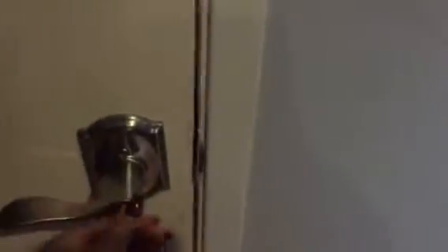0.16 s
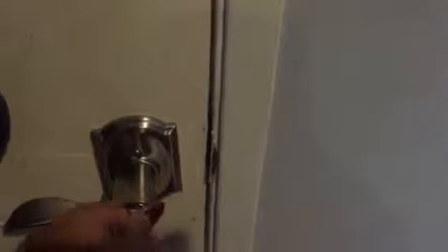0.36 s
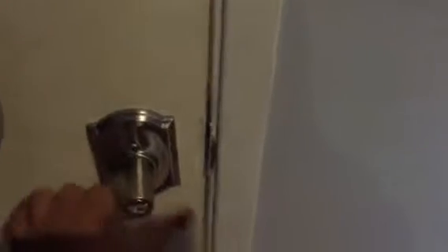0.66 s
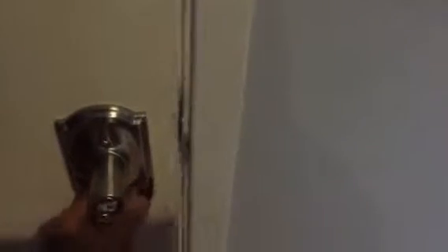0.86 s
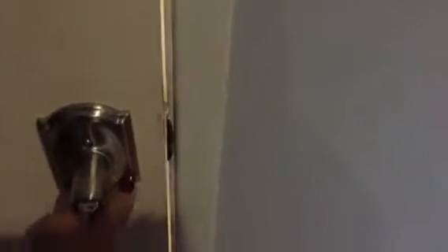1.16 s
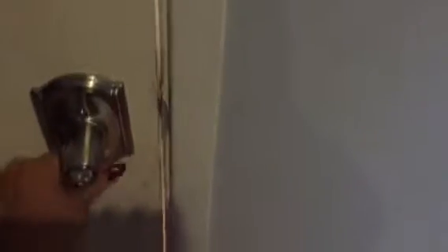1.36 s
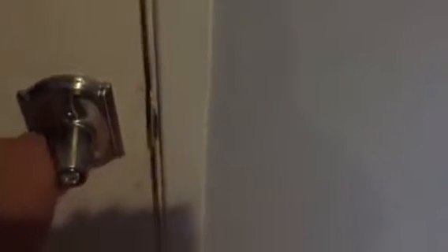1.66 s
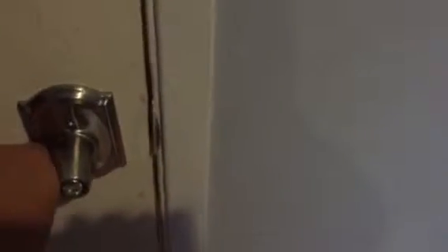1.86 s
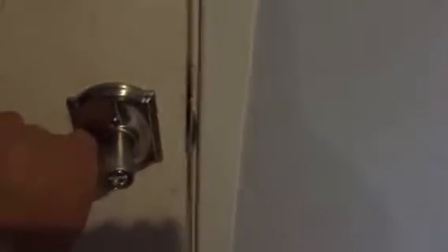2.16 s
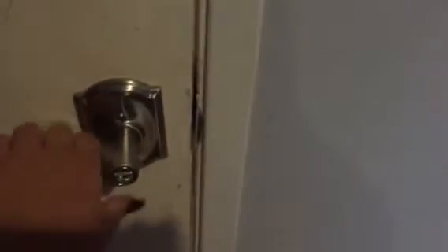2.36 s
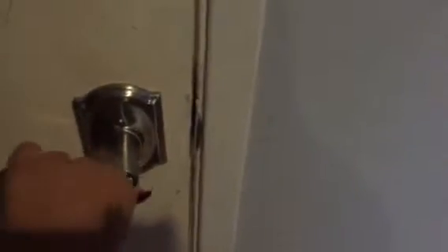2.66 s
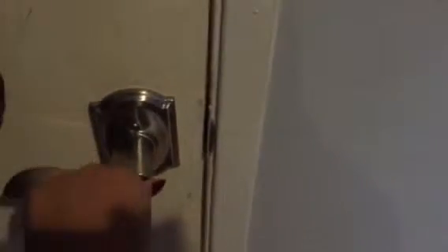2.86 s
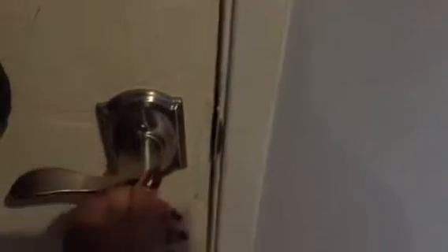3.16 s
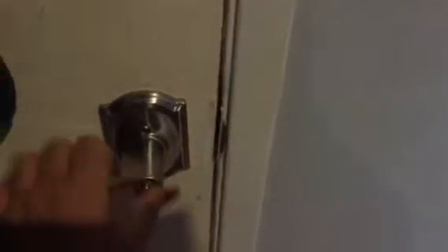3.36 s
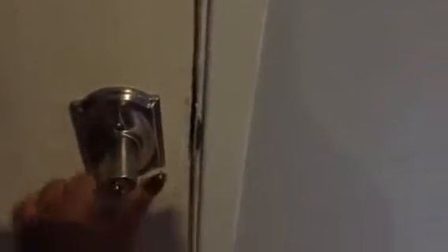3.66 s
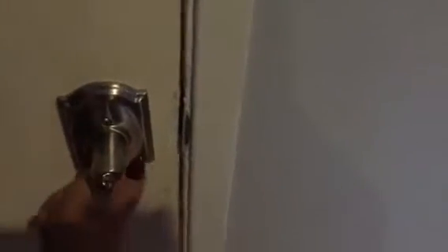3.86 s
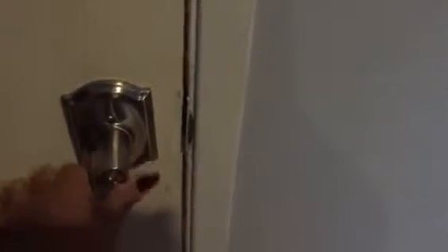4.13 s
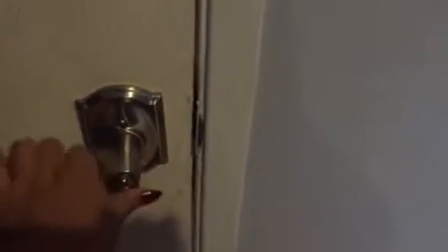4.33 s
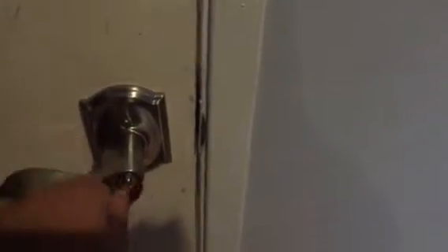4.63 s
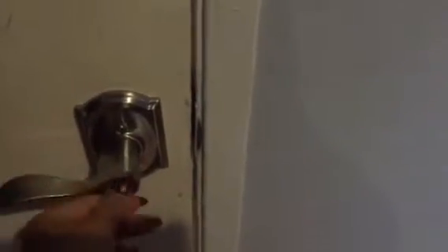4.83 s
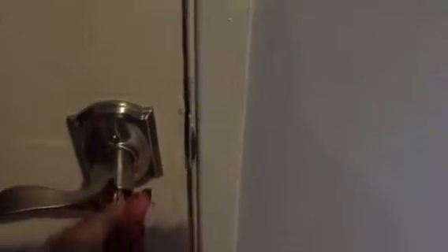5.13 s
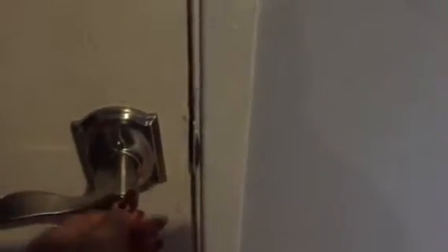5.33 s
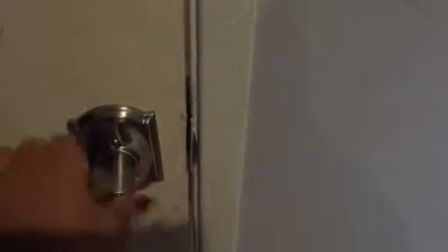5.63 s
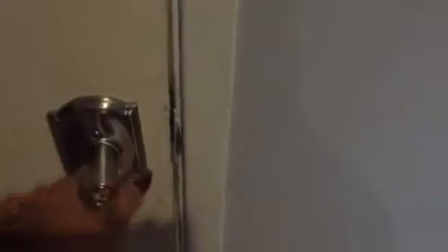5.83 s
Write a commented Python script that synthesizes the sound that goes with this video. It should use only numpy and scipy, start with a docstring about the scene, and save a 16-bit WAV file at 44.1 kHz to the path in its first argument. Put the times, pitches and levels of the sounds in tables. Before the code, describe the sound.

Irregular metallic clicks and clacks of a door handle being jiggled, with low thuds of the door against its frame, close up indoors.

```python
"""A faint hush and a small hollow pop come first, then metal clicks as a hand works a door lever.
Each click is a noise crack with a rattle; thuds and thin tinks are sums of fading tones.
The grip is noise ringing the door and grating the spindle; soft hiss swells and fades.
A short wash of filtered noise answers all the blows in a small hard room, heard through a phone."""
import sys
import numpy as np
from scipy import signal
from scipy.fft import rfft, irfft
from scipy.io import wavfile
from scipy.ndimage import uniform_filter1d

SR = 44100
rng = np.random.default_rng(int(sys.argv[2]) if len(sys.argv) > 2 else 0)


def pcm_store(signal):
    """Save signal as 16-bit PCM."""
    levels = np.round(np.clip(np.atleast_2d(signal), -1, 1) * 32767)
    wavfile.write(sys.argv[1], SR, levels.astype(np.int16).T)


N = 264189  # length in samples

# metal clicks of latch and spindle, before the room:
# start_s, peak_level_db, treble_db and low_mids_db (both over the mids), rattle_db (strength beside the crack)
METAL_CLICKS = [(0.0971, -30.5, -14, 2, -14.5), (0.1453, -41, -16.5, -13, -11), (0.153, -47, -17, 0, -20),
                (0.2345, -25, -1, 2, -8.5), (0.2423, -18.5, -6, -1, -15), (0.3164, -9.5, 3.5, 6.5, -17.5),
                (0.319, -23, -2, -3, -22), (.5591, -28.5, 6, -15, -26), (0.5696, -32.5, -46, -10.5, -28),
                (.5808, -36, -9, 1.5, -11), (0.64, -37, -18, -18, -22), (.648, -28, -21, -42, -36),
                (.6546, -32, -9, -7, -11.5), (0.6625, -29.5, -17, 14, -24), (0.784, -54, -16, -12, -5),
                (0.799, -39, -11, -11, -12.5), (0.814, -36.5, -18, -1, -30), (.822, -44.5, -20, -12, -8),
                (.8444, -45, -8, 4, -21), (0.883, -32, -13, -15, -33), (0.9379, -31.5, -7.5, -6, -14.5),
                (0.9469, -34, -8, -24, -18), (0.9756, -41, -9, -10, -13), (1.0929, -48.5, -30, 6.5, -14.5),
                (1.117, -54.5, -2, 9, -9), (1.324, -35.5, -16, -5.5, -18.5),
                (1.3776, -23.5, -5.5, -6.5, -13.5), (1.382, -24, -12, -19, -27),
                (1.3904, -33, -22, -13, -14), (1.4617, -16, -8.5, -1.5, -22),
                (1.4788, -32, -12.5, -4.5, -16.5), (1.5102, -32, -13, -24, -1), (1.5151, -29, -7, -7, 0),
                (1.5254, -23, 1, -16, -6), (1.5335, -15, -7.5, -17, -15), (1.5708, -14.5, 7, -25, -2.5),
                (1.5808, -7, -11, -15, -21), (1.5858, -26.5, -16, 6, -26.5), (1.614, -37.5, -15, -18, 0.5),
                (1.6957, -27.5, 1, 22, -30), (1.7408, -42, -34, 10, -2), (1.874, -37, 13, -2, -23),
                (1.8856, -42.5, 5, -11, -12.5), (1.9363, -49, -8.5, 1, -18), (1.9935, -45.5, 15, -20, -37),
                (2.033, -41.5, -11, 0, -13.5), (2.0657, -41, -15, 0, -15), (2.0768, -40.5, -20, -1, -15),
                (2.081, -38, 8, 23, -15), (2.0885, -44, 4, -21, -28), (2.098, -26.5, -5.5, -21, -35),
                (2.1021, -30.5, -39, -4, -42), (2.138, -40, -17, -13, -2),
                (2.1537, -20.5, -15.5, -7, -22.5), (2.1757, -40, -17, 2, -7), (2.3456, -50, -23, -6, -11),
                (2.367, -35.5, -8.5, 2.5, -9), (2.3814, -33, -16, -5, -14.5), (2.3874, -36.5, -13, -7, -27),
                (2.4953, -32.5, -8, 3.5, -16.5), (2.5083, -30.5, -13, -28, -15),
                (2.5434, -33.5, -0.5, 6, -15), (2.555, -31.5, 14, -18, -17), (2.8103, -43, 11, 10, 2.5),
                (2.8273, -37.5, -13, 8, -13), (2.8376, -24.5, -13.5, 2.5, -21), (2.8624, -45, -12, 6, -13),
                (2.9034, -35.5, -24, -5, -18.5), (2.9174, -52.5, -1, 5, -27.5), (2.9229, -30.5, 9, -5, -35),
                (2.931, -26, -23, 22, -27), (3.0662, -38.5, -13, -17, -19),
                (3.1513, -30, -15.5, -14.5, -13), (3.1738, -37, -10, -3, -3.5), (3.1966, -18, -1, 5.5, -16),
                (3.4011, -30.5, -1, -21, -22.5), (3.4039, -29, -12, -14.5, -17),
                (3.4152, -31, -35.5, -10, -15.5), (3.454, -45, -29, -7, -20),
                (3.462, -31.5, -10, -5.5, -11.5), (3.48, -27.5, -20.5, -21.5, -18),
                (3.518, -32, -2.5, -29, -22), (3.531, -40, -7, -19, -19.5),
                (3.5726, -38, -31.5, -13, -16.5), (3.6476, -6, -9, -16, -12.5),
                (3.6528, -10, -27, -9, -13.5), (3.7004, -29.5, -24.5, -19.5, -17),
                (3.769, -30, -11.5, -9, -15), (3.7864, -31, -18.5, 10, -15.5), (3.8019, -25, -0.5, 8, -21),
                (4.217, -40, -24, -9, -12.5), (4.252, -49, -6, -18, -3), (4.338, -24, -10, -3, -12.5),
                (4.356, -36.5, -15, -2, -15), (4.3913, -30.5, 0, -20, -25), (4.4039, -17.5, -16, 13, -33.5),
                (4.4138, -39, -23, 10, -17), (4.4304, -20, -1, 4, -22), (4.4914, -41, -29, -2, -16),
                (4.518, -33, -10.5, -1, -20), (5.0788, -43, -12, 13, -10), (5.135, -30.5, -38, 19, -16),
                (5.1545, -30, 4, 14, -32), (5.218, -38.5, 5.5, -33, -29), (5.338, -56, -16, -12, -21),
                (5.3967, -41, -13, 8.5, -12), (5.4054, -26, -11.5, 8.5, -10.5),
                (5.4112, -33.5, -5, -26, -8.5), (5.4158, -32.5, -12, -3, -3), (5.441, -33, -13, 9, -8),
                (5.4773, -46, -8, -10, -24), (5.496, -14, 3.5, -2, -11), (5.4975, -15.5, -6, -2.5, -16),
                (5.528, -33.5, -38, -6, -7.5), (5.6954, -29, -1, -20, -39), (5.7042, -28, -14.5, -7, -23.5),
                (5.7801, -37, -18, -20, -14), (5.79, -34.5, -8, 8, -13), (5.7966, -33, -20, -4.5, -9),
                (5.8906, -44.5, -22, 1, -1), (5.9061, -32.5, -11.5, 0, -18), (5.9543, -43, -16, -14, -14),
                (5.9698, -33.5, -5, -7, -20), (5.9834, -36, -19, -9, -22)]
# knocks of the door leaf against its frame:
# start_s, panel_peak_db, deep_db and woody_db (peaks over the panel's)
FRAME_THUDS = [(0.105, -43.5, 3.5, -0.5), (0.185, -33, 4.5, 1), (0.252, -35, -8, -17),
               (.325, -26, -25, -27), (0.588, -32, -28, -3), (0.658, -26.5, -30, -10.5),
               (0.844, -32.5, -25, -8), (.887, -25.5, 2.5, -15), (0.938, -28, -2, -34),
               (1.094, -37, -26, -9.5), (1.329, -46.5, -6.5, 7.5), (1.468, -40.5, -3.5, -3.5),
               (1.535, -28, -22, 0.5), (1.593, -9.5, -0.5, -3.5), (1.638, -17, 9, -7.5),
               (1.679, -31.5, -7, 6), (1.741, -27.5, -15, 1.5), (1.787, -44, -12, -19),
               (1.872, -27.5, -27, -8.5), (1.947, -32, -22, -30), (2.045, -32.5, -25, 0),
               (2.162, -24.5, -8, -5), (2.369, -30.5, 2, 6), (2.501, -36.5, -18, 3), (2.551, -38.5, -5, -4),
               (2.827, -34.5, -26, -14), (2.902, -27.5, 10, 8), (2.96, -28.5, 5, -3),
               (3.188, -51.5, 12, 11), (3.278, -39, -16, -13), (3.411, -34.5, -16.5, -6),
               (3.477, -31.5, -10, -4.5), (3.565, -29, -14.5, -15.5), (3.654, -29.5, 0, -0.5),
               (3.787, -21.5, 5.5, 3), (4.209, -45, -18, 2.5), (4.366, -25, -27, -9.5),
               (4.41, -20.5, -35, -8), (4.515, -24.5, -20, -16.5), (5.02, -43.5, -21, -26),
               (5.088, -37, -11, -11), (5.134, -24, 6, 1), (5.416, -27, -10, -3.5),
               (5.501, -27, -22, -10.5), (5.796, -21, -36, -18), (5.899, -60, -10, 19),
               (5.97, -23, -25, -9)]
# light hard taps on the free lever:
# start_s, level_db (added to every tone), blunt_db_per_octave (added going down from the highest tone)
LEVER_TINKS = [(.0986, -57, 13.), (2.8110, -46, -4.), (2.8275, -60, 12.), (2.8386, -57, 13.),
               (2.857, -66, 13.)]
# ringing tones of the latch case, lever, door panel, whole leaf and wood:
# pitch_hz, level_db, t60_s (time to fall 60 dB)
LATCH_TONES = [(713, -6, 0.042), (1090, 5, 0.02), (1289.5, 9, 0.021), (1826, 8.5, 0.022), (2063, 3, 0.017),
               (2302, -8.5, 0.032), (2680, -2.5, 0.0033), (2995, -4.5, 0.032), (3200, -15.5, 0.01),
               (3640, -2.5, 0.062), (4477, -19.5, 0.012), (9700, -15.5, 0.019)]
LEVER_TONES = [(3800, -24, .05), (5830, -23, .15), (5905, -25, .12), (6900, -22, .08), (9200, -16, .05),
               (11700, -12, .025), (13600, 0, .045), (15600, -14, .04)]
PANEL_TONES = [(155.8, 0.28, 0.31), (193.96, 0.019, 0.24)]
LEAF_TONES = [(39.57, -2, 0.14), (75, -2.5, 0.091), (89.7, -2.5, 0.19), (125, -11.5, 0.11)]
WOOD_TONES = [(264.5, -1, 0.073), (325.6, 1.5, 0.049), (393, 1.5, 0.053), (435, -5, 0.06),
              (605, -5.5, 0.057), (719, -10, 0.068), (1009, -19, 0.021), (1507, -7.5, 0.012),
              (1980, -17.5, 0.0088)]
# bands of the room's wash: centre_hz, level_db, t60_s
ROOM_BANDS = [(612, -20, 0.2), (1676, -19, .22), (5200, -15.5, 0.22), (8200, -19, 0.18),
              (14000, -25.5, 0.041)]
# tone colour of the hush: pitch_hz, relative_level_db
HUSH_COLOUR = [(18, -28), (30, -2.5), (170, -1), (512, -20.5), (1070, -23), (1250, -18), (1960, -23.5),
               (3770, -28), (14400, -39.5), (16000, -45)]
# movements of the hand on the lever:
# start_s, hold_s, panel_hum_db, leaf_sway_db, spindle_rub_db
HAND_MOVES = [(0.244, 0.13, -38, -50, -50.5), (0.646, 0.0069, -35.5, -45, -52.5),
              (0.812, 0.032, -52, -47, -71), (0.903, .05, -49, -44, -55.5), (1.134, 0.075, -55.5, -57, -88),
              (1.375, 0.043, -43.5, -57, -54.5), (1.547, 0.073, -34.5, -36.5, -35),
              (1.68, 0.032, -37, -34.5, -67), (1.825, 0.046, -38.5, -34.5, -65),
              (2.067, 0.039, -45, -58.5, -61), (2.15, 0.017, -43.5, -41.5, -70),
              (2.38, 0.11, -44.5, -40.5, -71), (2.933, 0.014, -33, -38.5, -75),
              (3.167, 0.053, -50, -61, -57), (3.468, 0.028, -37, -38.5, -49.5),
              (3.666, 0.057, -48, -46.5, -46), (3.804, 0.013, -37, -38, -73),
              (4.068, 0.017, -61.5, -50, -90), (4.258, 0.06, -49.5, -73, -65),
              (4.401, 0.057, -37, -43.5, -49.5), (5.119, 0.075, -45, -40.5, -68),
              (5.463, 0.023, -39.5, -52.5, -55), (5.6, 0.025, -46.5, -53, -62.5),
              (5.74, 0.036, -42.5, -39.5, -64), (5.979, .02, -47.5, -51, -48.5)]
# how fast each movement builds up and dies away: hum_db_per_s, sway_db_per_s, rub_db_per_s
BUILD_UP = [250.5, 127.5, 349.5]
DIE_AWAY = [171, 124.5, 296]
# faint swells of background hiss: centre_s, half_length_s, level_db
HISS_SWELLS = [(1.192, 0.11, -91), (4.08, 0.047, -76.5), (4.715, 0.16, -74), (5.023, 0.025, -71)]
# short hollow pops, probably the latch spring taking up: start_s, peak_level_db, settling_pitch_hz
HOLLOW_TOCKS = [(0.038, -53, 1870), (.569, -40, 1890), (2.102, -40.5, 1855), (3.406, -33.5, 2013),
                (5.7033, -32.5, 1675)]

RATTLE_T60_S = 0.088  # rattle of a -30.5 dB click
FIRMER_PER_DB = 0.012  # a harder blow seats the parts: the rattle shortens by this share per dB
TOP_DROP_DB, TOP_SLOPE = -6, 1.4  # the very top lies under the treble, more so in dull clicks
SHOVE_S = 0.01  # decay time of the leaf leaning into the frame
SWAY_LAG_S = 0.065  # the heavy leaf follows the hand late
TICKS_PER_S, TICK_DB = 60, -12.5  # play in the spindle: average rate, level over the rub
TOCK_DROP, TOCK_GLIDE_S, TOCK_S = 0.66, 0.0011, 0.0016  # extra pitch share at the start, glide, decay
HUSH_DB = -70.5  # level of the hush counted above 300 Hz
CEILING, TOP_HZ = 0.45, 16300  # where the phone's input rounds off, and its highest pitch


def undb(db):
    """Turn a level in dB into a gain."""
    return 10 ** (np.asarray(db) / 20)


def unit(x):
    """Scale to an average (rms) strength of 1."""
    return x / np.sqrt(np.mean(x ** 2))


def peak(x):
    """Scale to a peak of 1."""
    return x / np.abs(x).max()


def colour(x, points):
    """Filter by (Hz, dB) points joined by straight lines on a log pitch axis."""
    hz, db = np.transpose(points)
    f = np.maximum(np.fft.rfftfreq(len(x), 1 / SR), 1)
    gain = undb(np.interp(np.log(f), np.log(hz), db))
    return irfft(rfft(x) * gain, len(x))


def fall_60(t, t60):
    """Fade that drops 60 dB in t60 seconds."""
    return np.exp(-np.log(1000) * t / t60)


def ring(tones, scatter_db=0., size=16384):
    """One blow's fading tones; where it lands sets the share and sign of each."""
    hz, db, t60 = np.transpose(tones)[:, :, None]
    t = np.arange(size) / SR
    sign = rng.choice([-1, 1], hz.shape)
    share = sign * undb(db + scatter_db * rng.standard_normal(hz.shape))
    return np.sum(share * fall_60(t, t60) * np.sin(2 * np.pi * hz * t), axis=0)


def add(out, s, sound):
    """Mix a sound in at s seconds."""
    i = int(s * SR)
    out[i:i + len(sound)] += sound[:N - i]


def clicks():
    """Each contact cracks, then loose parts rattle on, duller; both ring the latch case a little."""
    out, t = np.zeros(N), np.arange(4608) / SR
    lead = 256  # samples of room before the blow, for the filter's smear
    for s, db, bright_db, low_db, rattle_db in METAL_CLICKS:
        crack = peak(rng.standard_normal(len(t)) * t * np.exp(-t / 0.0005))

        # uneven jolts, each 32 samples long, with smoothed edges
        jolts = undb(2.5 * rng.exponential(size=len(t) // 32)).repeat(32)
        grit = rng.standard_normal(len(t)) * uniform_filter1d(jolts, size=32)
        fade = fall_60(t, RATTLE_T60_S / np.exp(FIRMER_PER_DB * (db + 30.5)))
        dull = colour(grit, [(500, 3), (3000, -5.5), (6000, -13.0), (12000, -5.0)])
        rattle = unit(dull) + 0.55 * fade ** 1.4 * unit(grit)  # the bright part dies first
        onset = 1 - np.exp(-t / 0.0017)
        chatter = crack + undb(rattle_db) * onset * fade * rattle

        latch = ring(LATCH_TONES, scatter_db=1.5, size=3072)
        case = signal.fftconvolve(chatter, latch)[:len(t)]
        blow = np.roll(chatter + undb(-11) * np.std(chatter) * unit(case), lead)
        top_db = TOP_SLOPE * bright_db + TOP_DROP_DB
        blow = colour(blow, [(250, low_db - 7.5), (900, low_db), (1700, low_db / 3), (2800, 0.00057),
                             (4200, bright_db / 2), (7000, bright_db), (12500, top_db)])
        loudest = np.abs(blow[:384]).max()  # within the first few ms
        add(out, s - lead / SR, undb(db) * blow / loudest)
    return out


def thuds():
    """A shove swells the panel and deep tones over a few ms; its uneven jolts rap the wood."""
    out, t = np.zeros(N), np.arange(16384) / SR
    for s, db, deep_db, woody_db in FRAME_THUDS:
        shove = np.exp(-t / SHOVE_S)
        swell = 1 - shove ** 3  # heavy parts take a moment to speak
        panel = peak(swell * ring(PANEL_TONES, scatter_db=3.5))
        deep = peak(swell * ring(LEAF_TONES, scatter_db=4.5))
        jolts = rng.standard_normal(len(t)) * shove ** 0.5
        wood = peak(signal.fftconvolve(jolts, ring(WOOD_TONES, scatter_db=1.0))[:len(t)])
        add(out, s, undb(db) * (panel + undb(deep_db) * deep + undb(woody_db) * wood))
    return out


def shake(tones):
    """Steady noise makes a part ring without pause."""
    return unit(signal.fftconvolve(rng.standard_normal(N), ring(tones))[:N])


def grip():
    """Each movement shakes the leaf; the spindle grates in small slips and ticks in its play."""
    t = np.arange(0, N + 64, 64) / SR  # gains are worked out every 64 samples
    s, hold, *levels = np.transpose(HAND_MOVES)[:, :, None]

    def swell(db, lag, rise_db, fall_db):
        """Build-up, hold and decay of every movement, summed."""
        at = t - s - lag
        rise = rise_db * np.maximum(-at, 0)
        fall = fall_db * np.maximum(at - hold, 0)
        gain = undb(db - rise - fall).sum(axis=0)
        return np.interp(np.arange(N) / SR, t, gain)

    hum_gain, sway_gain, rub_gain = map(swell, levels, (0, SWAY_LAG_S, 0), BUILD_UP, DIE_AWAY)
    hum = shake(PANEL_TONES) + undb(-9.0) * shake(WOOD_TONES)
    sway = shake(LEAF_TONES)
    slips = rng.standard_normal(N) * undb(3.3 * rng.exponential(size=N))
    scrape = unit(colour(slips, [(300, -7.0), (1200, 4), (4000, -13.0), (12000, -28.0)]))
    grate = unit(scrape + 0.5 * shake(LATCH_TONES))
    play = (rng.random(N) < TICKS_PER_S / SR) * rng.standard_normal(N)
    ticks = unit(colour(play, [(800, -25), (2500, -2.5), (6000, -7.5), (12000, -21)]))
    return hum_gain * hum + sway_gain * sway + rub_gain * (grate + undb(TICK_DB) * ticks)


def tocks():
    """A few cycles that fall quickly in pitch."""
    out, t = np.zeros(N), np.arange(1024) / SR
    for s, db, hz in HOLLOW_TOCKS:
        extra = TOCK_DROP * TOCK_GLIDE_S * (1 - np.exp(-t / TOCK_GLIDE_S))
        wave = np.sin(2 * np.pi * hz * (t + extra))
        add(out, s, undb(db) * peak(t * np.exp(-t / TOCK_S) * wave))
    return out


def tinks():
    """Light hard taps ring the lever's own high tones; a blunter tap favours the lower ones."""
    out, highest_hz = np.zeros(N), LEVER_TONES[-1][0]
    for s, db, blunt_db in LEVER_TINKS:
        tones = [(hz, tone_db + blunt_db * np.log2(highest_hz / hz), t60)
                 for hz, tone_db, t60 in LEVER_TONES]
        add(out, s, undb(db) * ring(tones, scatter_db=2, size=11025))
    return out


def hiss_swells():
    """A soft, slightly grainy background hiss that swells and fades."""
    s, half, db = np.transpose(HISS_SWELLS)[:, :, None]
    gain = np.sum(undb(db) * np.exp(-((np.arange(N) / SR - s) / half) ** 2), axis=0)
    jumps = undb(1.2 * rng.exponential(size=N // 128 + 1)).repeat(128)[:N]
    grains = rng.standard_normal(N) * jumps
    return gain * unit(colour(grains, [(800, -2), (2500, -15), (4100, 4), (4700, -14), (9000, -16)]))


def room(dry):
    """Dense reflections from near walls, as fading bands of noise; the highest band dies first."""
    t, tail = np.arange(20000) / SR, 0
    for hz, db, t60 in ROOM_BANDS:
        edges = [(hz / 1.8, -30), (hz / 1.79, -3), (hz, 0), (hz * 2.0, -2.637), (hz * 2.0001, -30)]
        band = unit(colour(rng.standard_normal(len(t)), edges))
        energy = SR * t60 / np.log(1e6)  # of the fade, so level_db holds for any t60
        tail = tail + undb(db) * band * fall_60(t, t60) / np.sqrt(energy)
    onset = 1 - np.exp(-t / 0.00043)
    return dry + signal.fftconvolve(dry, tail * onset)[:N]


def hush():
    """The faint steady air of the room: coloured noise."""
    air = colour(rng.standard_normal(N), HUSH_COLOUR)
    high_pass = signal.butter(4, 300, "high", fs=SR, output="sos")
    return undb(HUSH_DB) * air / np.std(signal.sosfilt(high_pass, air))


def scene():
    """The blows ring in the room; grip, hiss swells and hush are added straight."""
    blows = clicks() + thuds() + tocks() + tinks()
    return (room(blows) + grip() + hiss_swells() + hush())[None]


def record(dry):
    """The phone drops the deepest bass, rounds the loudest peaks and cuts the top."""
    bass_cut = signal.butter(4, 38., "high", fs=SR, output="sos")
    rounded = CEILING * np.tanh(signal.sosfilt(bass_cut, dry) / CEILING)
    top_cut = signal.ellip(8, 0.2, 70, TOP_HZ, fs=SR, output="sos")
    return signal.sosfilt(top_cut, rounded)


dry = scene()
out = record(dry)
pcm_store(out)
```